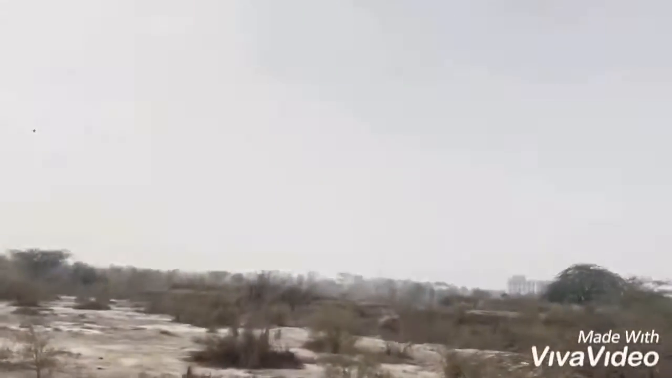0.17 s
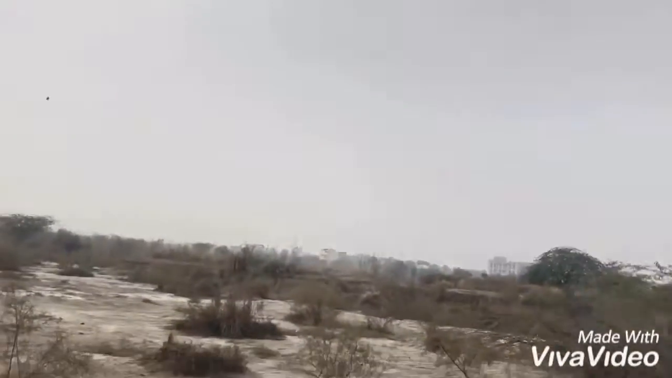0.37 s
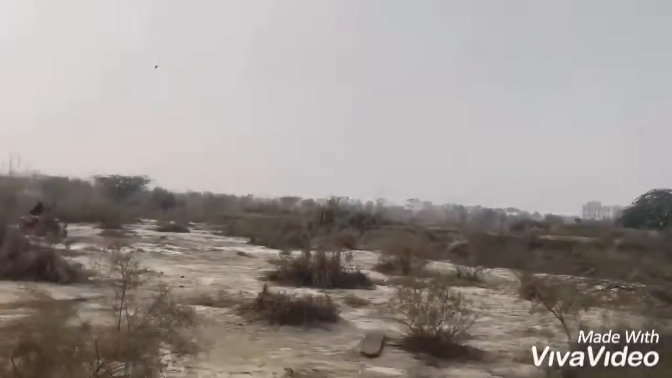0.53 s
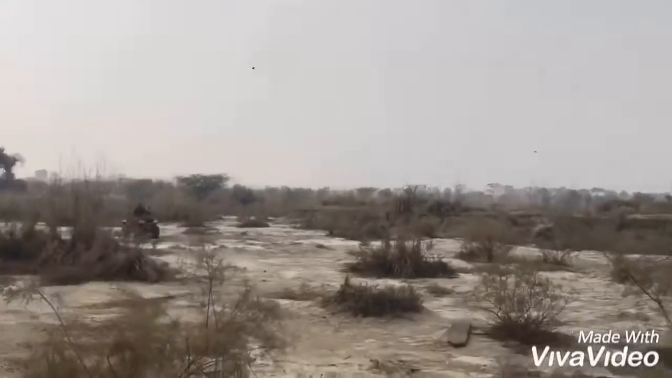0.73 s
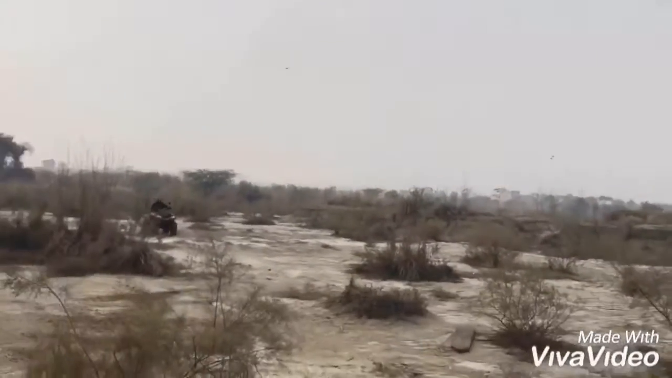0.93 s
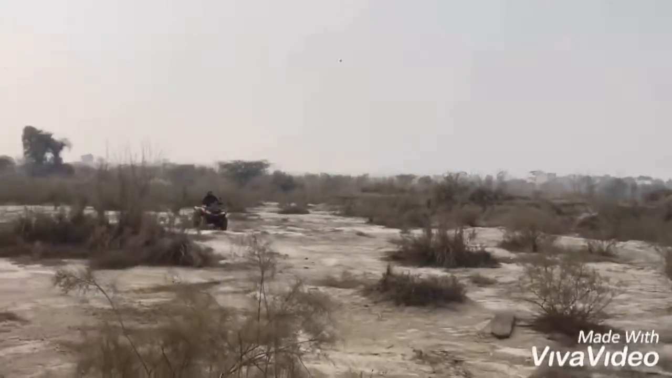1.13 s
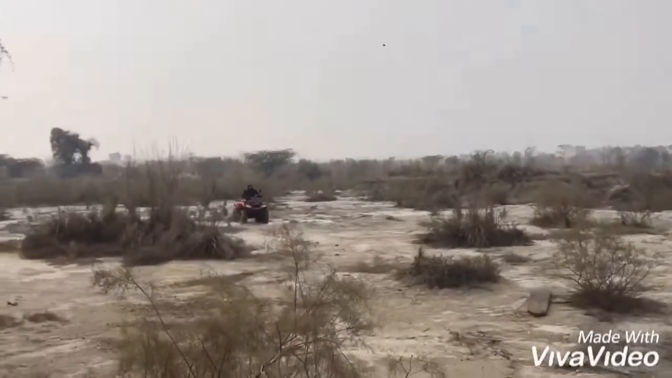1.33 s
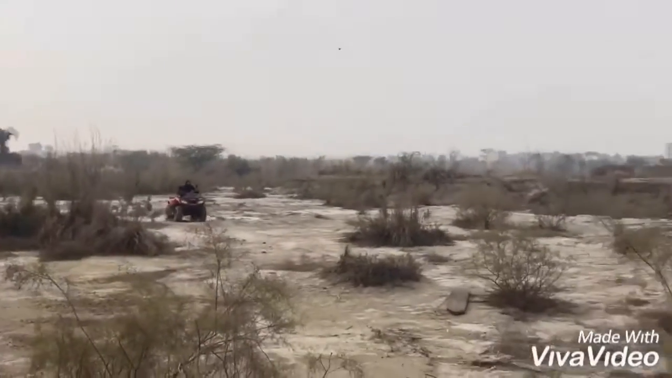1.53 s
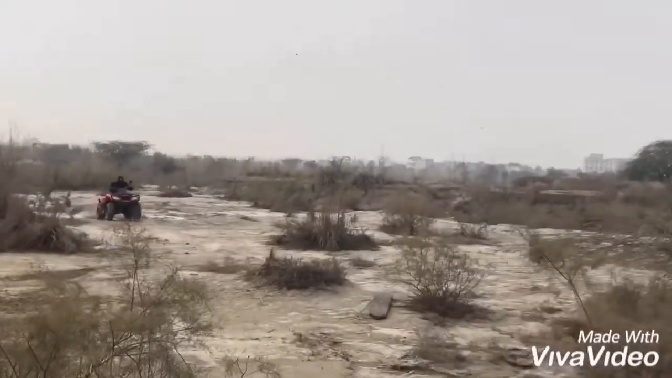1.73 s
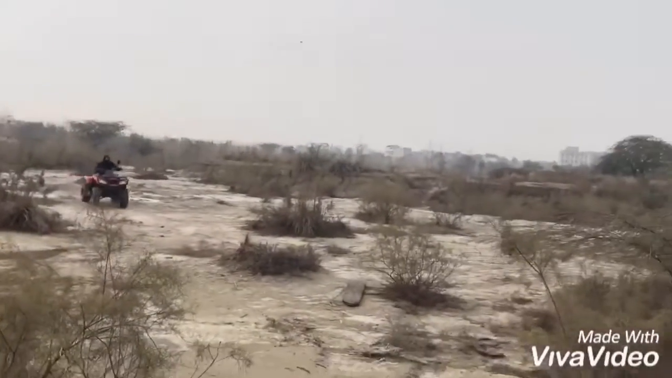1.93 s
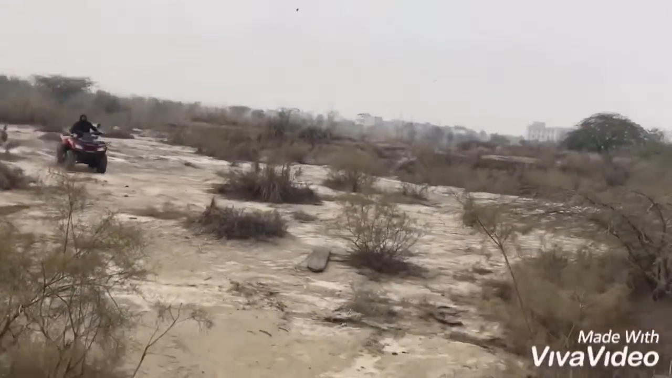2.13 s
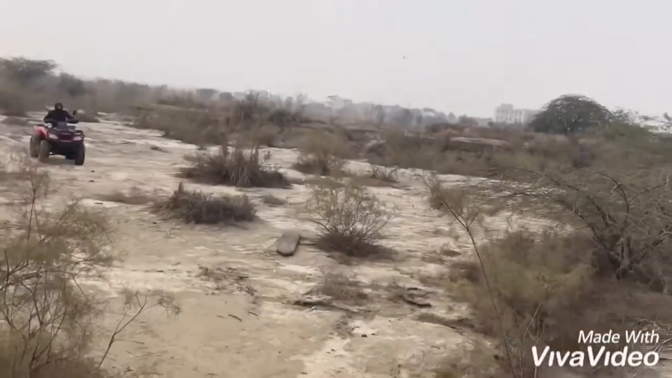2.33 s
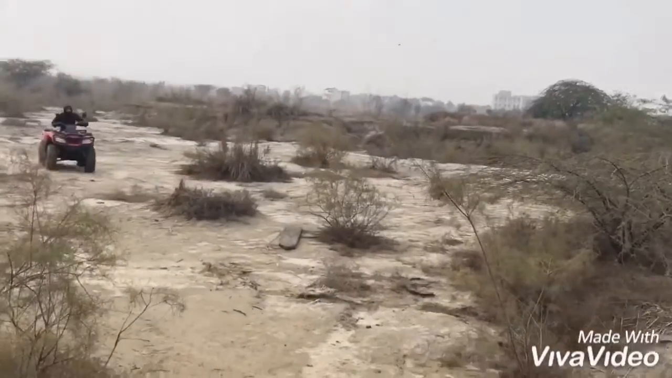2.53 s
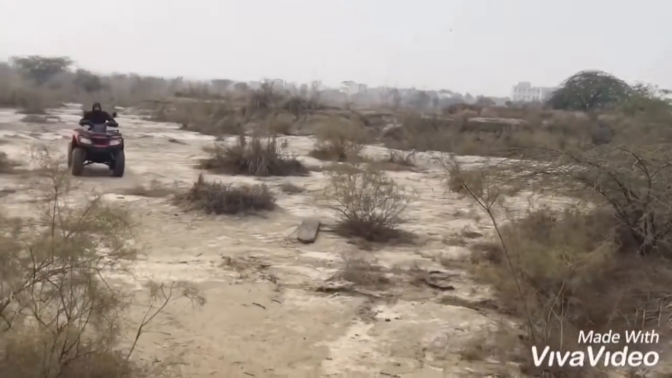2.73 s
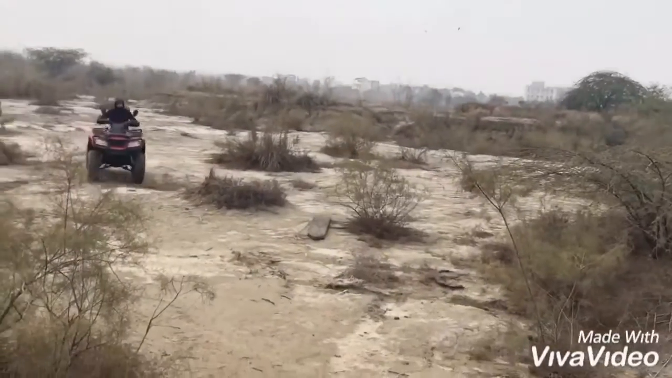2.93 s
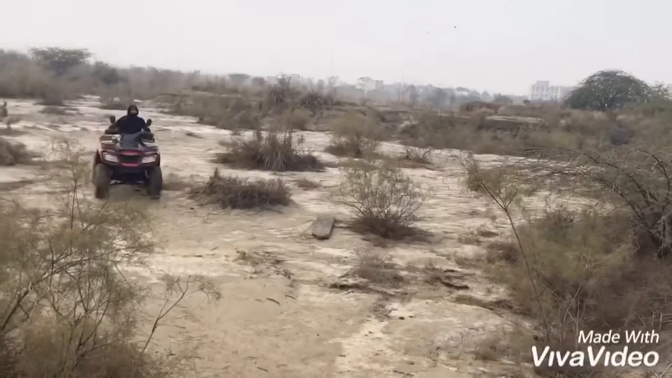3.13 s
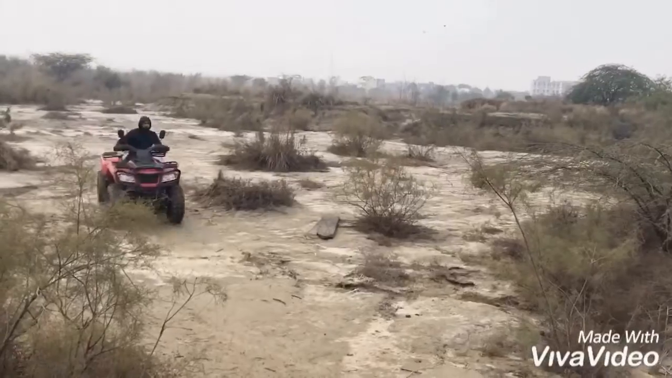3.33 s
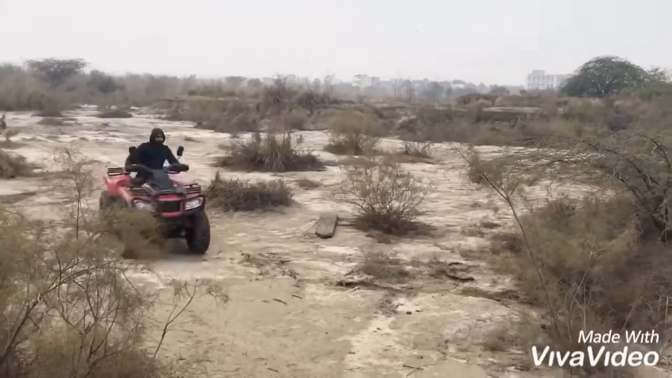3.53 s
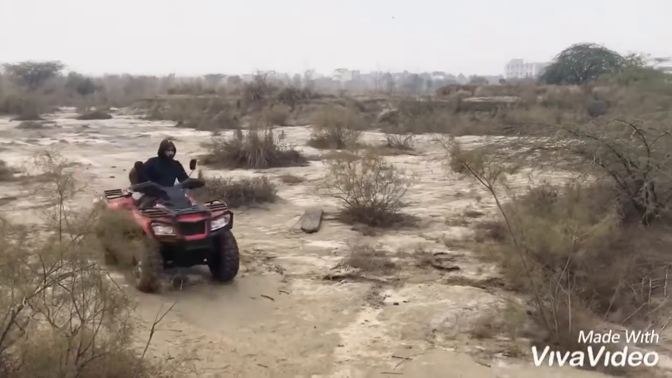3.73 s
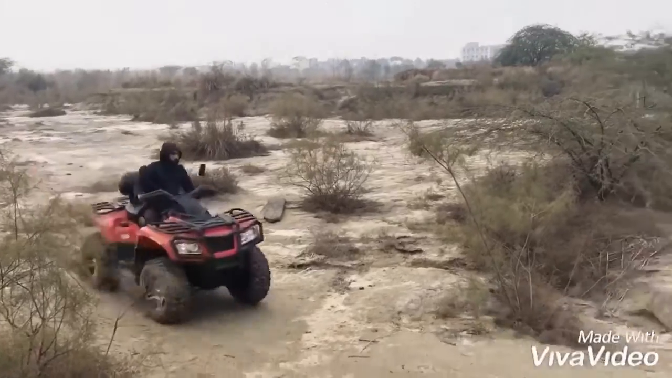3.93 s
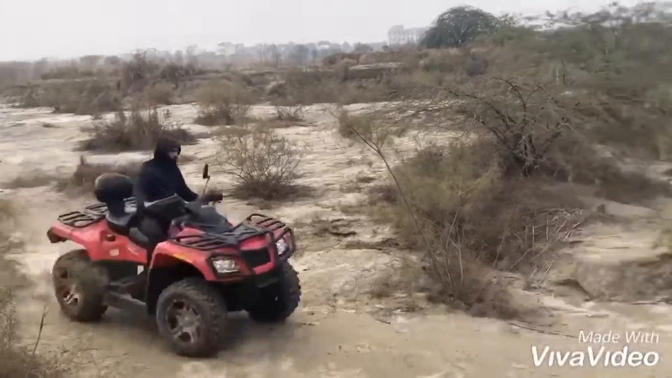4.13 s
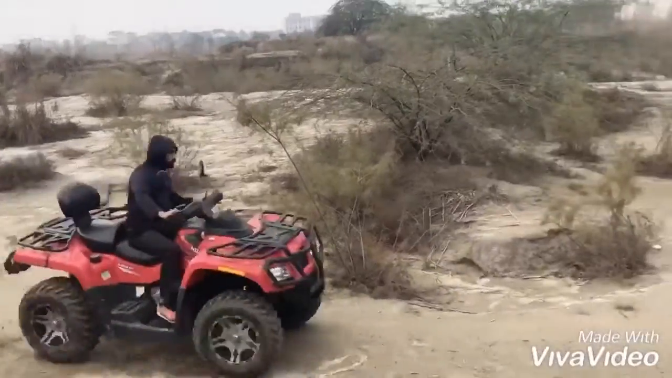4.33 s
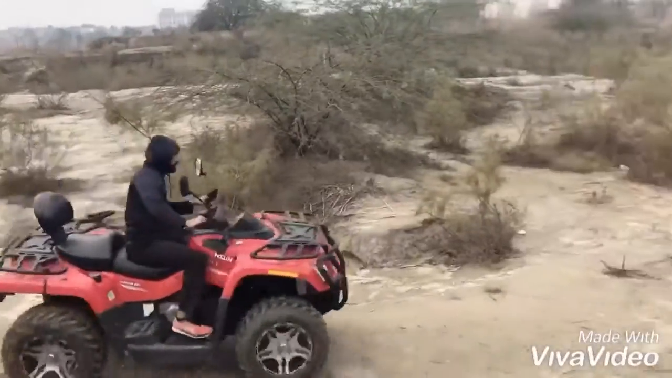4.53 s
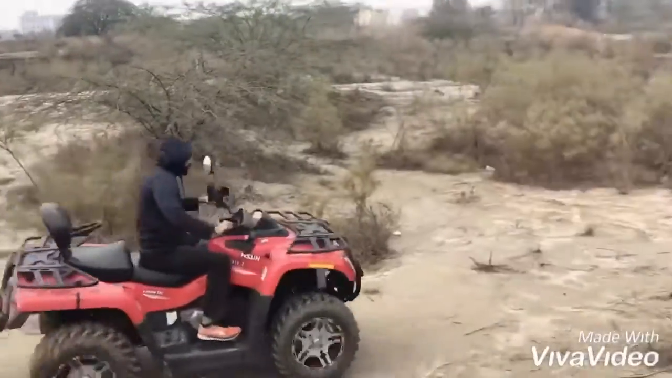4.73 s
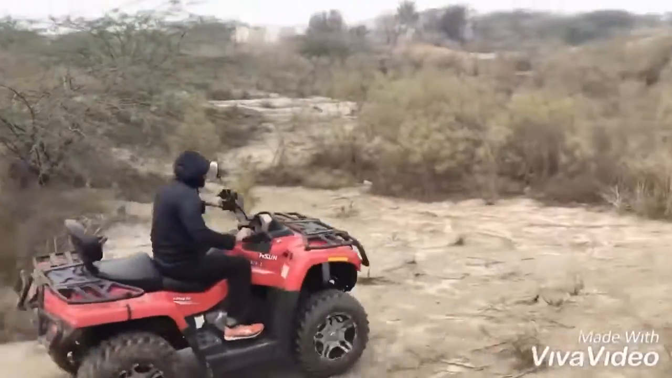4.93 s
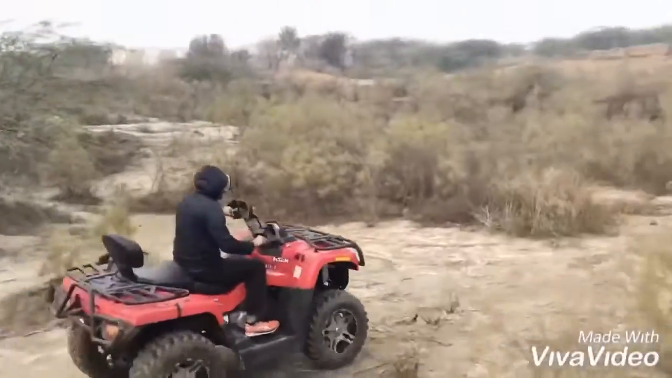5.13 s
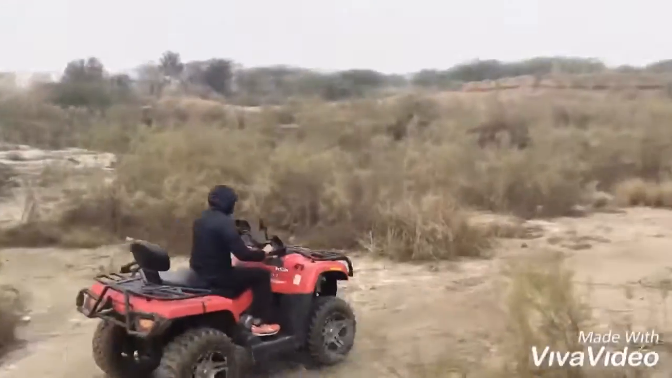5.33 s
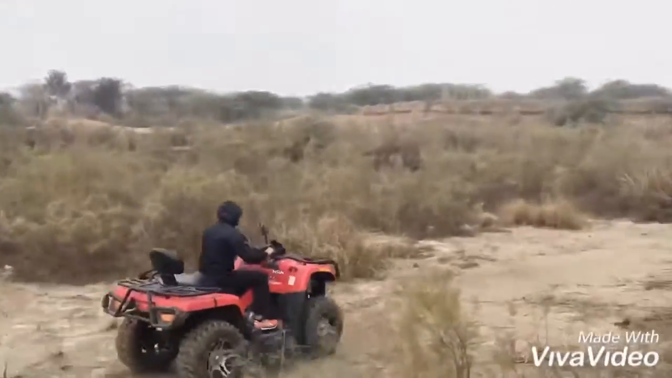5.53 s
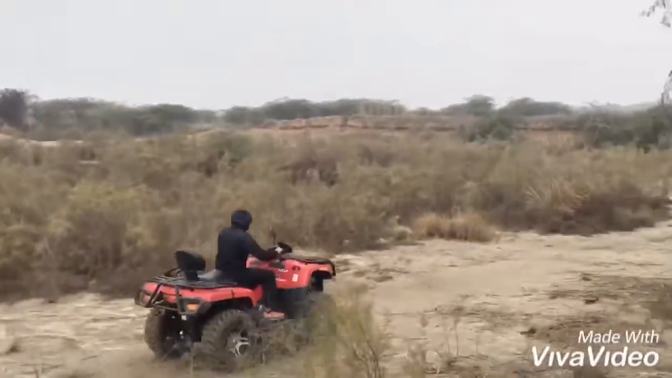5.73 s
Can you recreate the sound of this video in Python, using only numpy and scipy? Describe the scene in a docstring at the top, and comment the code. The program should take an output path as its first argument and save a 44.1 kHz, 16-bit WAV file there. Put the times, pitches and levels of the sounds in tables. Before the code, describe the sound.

A quad bike approaches over open, sandy ground, its engine throbbing and buzzing through three bursts of throttle. Racks rattle and plastic panels knock over bumps, with very faint brake squeaks. Close to the microphone the engine drops near idle, giving short low booms over the tyre rumble. Then the throttle opens and it passes, pulling away with a loud exhaust rasp.

```python
"""A V-twin quad bike approaches over rough sand in three bursts of throttle: each firing throbs in the
exhaust and buzzes in the tailpipe, valves and gears clatter, tyres roll. A distant chirp at 0.4 s.
From 1 s a dragging brake pad squeaks faintly; from 1.9 s bumps rattle the racks and knock the panels.
By 3.7 s the engine is near idle and the muffler booms in short blips. At 4.5 s the throttle opens;
the quad passes close by and pulls away, its tailpipe rasping."""
import sys
import numpy as np
from scipy import signal
from scipy.fft import rfft, irfft, next_fast_len
from scipy.io import wavfile

SR = 44100
rng = np.random.default_rng(int(sys.argv[2]) if len(sys.argv) > 2 else 0)


def store_pcm(level_fs):
    """Save levels as 16-bit WAV."""
    pcm = np.round(np.clip(level_fs, -1, 1) * 32767).astype(np.int16)
    wavfile.write(sys.argv[1], SR, np.atleast_2d(pcm).T)


N = 254898
TIME = np.arange(N) / SR

# engine speed in four-stroke cycles: time_s, cycle_hz
ENGINE_SPEED = [(0.0, 50.31), (0.212, 55.0), (0.373, 48.62), (1.043, 50.11), (1.252, 36.99), (1.403, 32.72),
                (1.537, 40.62), (1.877, 47.55), (1.983, 37.09), (2.345, 30.4), (2.776, 47.16),
                (2.924, 47.41), (3.076, 35.14), (3.37, 30.9), (3.693, 20.65), (3.746, 25.3), (4.387, 19.5),
                (4.556, 31.06), (4.757, 30.71), (4.953, 43.83), (5.237, 50.56), (5.424, 51.1),
                (5.532, 46.67), (5.683, 49.77), (5.78, 41.27)]
# throttle bursts: open_s, shut_s, first_load_db, last_load_db, extra_buzz_db
THROTTLE_BURSTS = [(-0.2, 1.109, -3, -6, 2.9), (1.46, 1.942, -4.5, -8.5, 8.5), (2.444, 2.961, -4, -4, 10),
                   (4.47, 4.785, -6, -0.2, 4), (4.766, 5.818, 4.5, 3.5, 2.4)]
# approach and pass: time_s, level_db
PROXIMITY = [(0, -21.5), (1.3, -14.5), (2.2, -12.5), (3, -11.5), (3.6, -3), (4.2, 0), (4.9, -0.5),
             (5.78, -4)]
# side facing the listener: front_until_s, alongside_at_s, behind_from_s
SIDE_TIMES = [4.2, 4.65, 5.32]
# phase spread of the exhaust orders: front_rad, alongside_rad, behind_rad
SIDE_SMEAR = [0.853, -0.39, 0.476]
# tailpipe buzz by side: front_db, alongside_db, behind_db
SIDE_BUZZ = [0.5, 4, -3.5]
# exhaust orders 1-8, even throb or lope: pull_db, coast_db
EXHAUST_ORDERS = [(9, -2.5), (12, 2.5), (3.5, 4), (-4.5, -6), (-9, -16), (-4, -16.5), (-6, -16.5),
                  (-7.5, -21)]
# throb spectrum: freq_hz, front_db, alongside_db, behind_db
THROB_SPECTRUM = [(25.0, -40, -43.5, -42), (45.8, -16.5, -20, -13.5), (76.3, -2.1, -10.5, -12.5),
                  (103, -1.16, 2.5, -20), (155.0, 0.76, 7, -5.6), (201, 1.1, -2, 1.75),
                  (281.5, -3.5, -16.5, -17.5), (420, -19.5, -21, -27)]
# muffler resonances: freq_hz, width_hz, level_db
MUFFLER_MODES = [(112, 28, 0), (190, 40, -3), (280, 40, -12)]
# muffler booms as the engine picks up near idle: centre_s, half_length_s, level_db
IDLE_BLIPS = [(3.75, 0.042, -33.5), (4.066, 0.052, -33.5), (4.239, 0.022, -27), (4.423, 0.12, -26.5)]
# boom spectrum: freq_hz, level_db
BOOM_SPECTRUM = [(90, 3), (120, 12.5), (155, -6.5), (185, -5.5), (215, 4.5), (280, -13), (345, -16.5),
                 (400, -35)]
# echoes between the baffles: delay_s
BAFFLE_DELAYS = [.0013, .0023, .0037]
# tailpipe buzz spectrum: freq_hz, level_db
BUZZ_SPECTRUM = [(330, -2), (410, 4), (460, 4), (520, -6), (575, 5), (620, 7), (690, -6), (800, -19),
                 (1000, -14), (1400, -15), (2500, -22)]
# clatter from afar, treble notched by the ground: freq_hz, level_db
FAR_CLATTER_SPECTRUM = [(400, -1), (600, -6), (850, -9), (1040, -20), (1250, -8), (1550, -16), (1950, -21),
                        (2400, -24), (3000, -28), (3650, -35), (4500, -35), (5200, -41.5), (6300, -41.5),
                        (9000, -53.5)]
# clatter close by: freq_hz, level_db
NEAR_CLATTER_SPECTRUM = [(450, -7), (650, 0), (850, -8), (1250, -9.5), (1550, -12), (1950, -16.5),
                         (2600, -23.5), (3050, -23), (3700, -30.5), (4600, -32.5), (5200, -37.5),
                         (6500, -37.5), (8000, -45.5), (14000, -54.5)]
# tyres on sand: time_s, level_db
TYRE_LEVEL = [(0, -43), (1.2, -42), (2.4, -39), (3.3, -35), (3.7, -29), (4.2, -26), (4.6, -31), (5.78, -29)]
# tyre spectrum: freq_hz, level_db
TYRE_SPECTRUM = [(30, -9.5), (60, -1), (120, 0.5), (220, 1), (350, -14), (700, -24.5)]
# open-air spectrum: freq_hz, level_db
AIR_SPECTRUM = [(100, 7.5), (1000, 7), (4000, -27.5), (8000, -29), (15000, -31.5)]
# brake squeaks: centre_s, half_length_s, level_db
BRAKE_SQUEAKS = [(1.03, .025, -70), (1.937, .03, -64.5), (2.564, 0.054, -73), (2.772, 0.036, -64),
                 (3.474, 0.023, -66), (3.88, 0.026, -61.5)]
# jolts to racks and panels: start_s, rattle_db, knock_db
JOLTS = [(1.93, -53, -35.5), (2.173, -56, -41), (2.292, -59, -41.5), (3.494, -47, -38),
         (3.563, -41.5, -31.5), (3.631, -39.5, -27), (3.718, -50, -34), (3.812, -44.5, -30.5),
         (3.94, -47.5, -31.5), (4.065, -49, -31), (4.107, -50, -29.5), (4.155, -46, -28),
         (4.199, -64, -30.5), (4.28, -53, -33), (4.295, -50, -28)]
# panel knock spectrum: freq_hz, level_db
PANEL_SPECTRUM = [(380, -14), (600, 3), (715, 8), (850, -4.5), (1000, 3), (1200, -5), (1550, -7),
                  (2200, -12)]
# rasp under load, as the tailpipe turns to the listener: time_s, level_db
RASP_LEVEL = [(0, -78), (2.4, -77), (2.8, -61), (3.1, -75), (4.4, -51.5), (4.72, -49.5), (4.77, -33),
              (4.85, -31), (4.95, -31), (5.2, -33.5), (5.45, -36), (5.7, -34.5), (5.78, -46)]
# rasp spectrum: freq_hz, level_db
RASP_SPECTRUM = [(900, 4), (1500, 4), (2400, -4), (3300, -11), (4500, -15), (5200, -19), (8000, -27),
                 (10300, -27), (11500, -25.5), (15500, -29.5)]

SECOND_FIRING_CYCLES = .39   # lag of the second cylinder


def from_db(db):
    """Decibels to gain."""
    return 10 ** (np.asarray(db) / 20)


def unit_rms(x):
    """Scale to unit power."""
    return x / np.sqrt(np.mean(x ** 2) + 1e-20)


def curve(rows):
    """A (time_s, value) table at every sample."""
    return np.interp(TIME, *np.transpose(rows))


def swells(rows):
    """Sum of bell-shaped envelopes."""
    return sum(from_db(db) * np.exp(-((TIME - centre_s) / half_s) ** 2) for centre_s, half_s, db in rows)


def gain_at(spectrum, hz):
    """Gain of a spectrum, falling 33 dB per octave beyond its ends."""
    freq_hz, level_db = np.transpose(spectrum)
    beyond_octaves = np.abs(np.log2(hz / np.clip(hz, freq_hz[0], freq_hz[-1])))
    return from_db(np.interp(np.log(hz), np.log(freq_hz), level_db) - 33 * beyond_octaves)


def colour(x, spectrum):
    """Filter by a spectrum; unit power."""
    size = next_fast_len(N + 4096)
    hz = np.maximum(np.fft.rfftfreq(size, 1 / SR), 1)
    return unit_rms(irfft(rfft(x, size) * gain_at(spectrum, hz), size)[:N])


def band(x, low_hz, high_hz):
    """Gentle band-pass; unit power."""
    sos = signal.butter(2, [low_hz, high_hz], "band", fs=SR, output="sos")
    return unit_rms(signal.sosfilt(sos, x))


def drift(rate_hz):
    """Smooth random wander; unit power."""
    hop = 40
    pole = np.exp(-2 * np.pi * rate_hz * hop / SR)
    noise = rng.standard_normal(N // hop + 2002)
    slow = signal.lfilter([1], [1, -2 * pole, pole * pole], noise)[2000:]
    return np.interp(np.arange(N) / hop, np.arange(len(slow)), unit_rms(slow))


def throttle(ramp_s):
    """Ramped bursts; gives openness (0-1), load_db and buzz_db."""
    opened, load_db, buzz_db = np.zeros((3, N))
    for open_s, shut_s, first_db, last_db, extra_db in THROTTLE_BURSTS:
        gate = np.clip(np.minimum(TIME - open_s, shut_s - TIME) / ramp_s + .5, 0, 1)
        opened += gate
        load_db += gate * np.interp(TIME, [open_s, shut_s], [first_db, last_db])
        buzz_db += gate * extra_db
    return np.minimum(opened, 1), load_db, buzz_db


def firing_clicks(cycles, cycle_hz, second_gain, jitter_cycles, uneven_db):
    """One click per cylinder and cycle, slightly early or late, strong or weak."""
    clicks = np.zeros(N)
    for lag, gain in ((0, 1), (SECOND_FIRING_CYCLES, second_gain)):
        count = np.floor(cycles - lag + jitter_cycles * drift(25))
        clicks[1:] += gain * (np.diff(count) > 0)
    return clicks * from_db(uneven_db * drift(36)) / np.sqrt(cycle_hz)


def firing_puffs(cycles, cycle_hz, decay_s, second_gain, floor, uneven_db):
    """Envelope: a decaying burst of random strength at each firing, over a floor; unit power."""
    envelope = floor
    for lag, gain in ((0, 1), (SECOND_FIRING_CYCLES, second_gain)):
        count, fraction = np.divmod(cycles - lag, 1)
        strength = from_db(uneven_db * rng.standard_normal(512))[count.astype(int) % 512]
        envelope = envelope + gain * strength * np.exp(-fraction / cycle_hz / decay_s)
    return unit_rms(envelope)


def muffler_phase_rad(hz):
    """The muffler's chambers delay the orders near each resonance."""
    response = sum(from_db(db) / (1 + 1j * (hz ** 2 - mode_hz ** 2) / (hz * width_hz))
                   for mode_hz, width_hz, db in MUFFLER_MODES)
    return np.angle(response)


def exhaust_throb(cycles, cycle_hz, opened, load_db, gain_db):
    """Low firing orders through the muffler: a throb under load, a lope coasting, booms near idle."""
    lag_cycles, coast_lag_cycles, boom_lag_cycles = .12, .161, .27
    side_weights = [np.interp(TIME, SIDE_TIMES, side) for side in np.eye(3)]
    smear_rad = np.interp(TIME, SIDE_TIMES, SIDE_SMEAR)
    freq_hz, *sides_db = np.transpose(THROB_SPECTRUM)
    blips = swells(IDLE_BLIPS)
    out = np.zeros(N)
    for order, (pull_db, coast_db) in enumerate(EXHAUST_ORDERS, 1):
        hz = order * cycle_hz
        colour_db = sum(weight * np.interp(np.log(hz), np.log(freq_hz), db)
                        for weight, db in zip(side_weights, sides_db))
        rad_per_cycle = 2 * np.pi * order
        phase = rad_per_cycle * (cycles - lag_cycles) + muffler_phase_rad(hz)
        smeared = phase + smear_rad * (order - 3) ** 2
        pulling = opened * from_db(pull_db + load_db) * np.cos(smeared)
        coasting = (1 - opened) * from_db(coast_db) * np.cos(smeared - rad_per_cycle * coast_lag_cycles)
        boom = blips * gain_at(BOOM_SPECTRUM, hz) * np.cos(phase - rad_per_cycle * boom_lag_cycles)
        waver_db = 1.3 * drift(5) + .2 * order * drift(14)
        out += from_db(waver_db) * (from_db(gain_db + colour_db) * (pulling + coasting) + boom)
    return np.sqrt(2) * out


def tailpipe_buzz(cycles, cycle_hz, feedback):
    """Echoes between the baffles smear each pulse's sharp edge into a rounded growl."""
    edges = firing_clicks(cycles, cycle_hz, second_gain=.35, jitter_cycles=.0015, uneven_db=.8)
    for delay_s in BAFFLE_DELAYS:
        taps = np.r_[1, np.zeros(int(delay_s * SR)), feedback]
        edges = signal.lfilter(taps[::-1], taps, edges)   # all-pass
    return colour(edges, BUZZ_SPECTRUM)


def engine_clatter(cycles, cycle_hz, ring_s, tick_db):
    """Valves and gears tick alike every cycle over a pulsing hiss; the colour fades from far to near."""
    age_s = TIME[:SR // 25]
    casing = rng.standard_normal(len(age_s)) * np.exp(-age_s / ring_s)
    strikes = firing_clicks(cycles, cycle_hz, second_gain=.8, jitter_cycles=.0005, uneven_db=1)
    ticks = unit_rms(signal.fftconvolve(strikes, casing)[:N])
    puffs = firing_puffs(cycles, cycle_hz, decay_s=.005, second_gain=.6, floor=1.3, uneven_db=1.5)
    source = from_db(tick_db) * ticks + puffs * rng.standard_normal(N)
    near = np.interp(TIME, [1.9, 2.7], [0, 1])
    return (1 - near) * colour(source, FAR_CLATTER_SPECTRUM) + near * colour(source, NEAR_CLATTER_SPECTRUM)


def tyres():
    """Low rumble of tyres rolling on sand."""
    return from_db(curve(TYRE_LEVEL)) * colour(rng.standard_normal(N), TYRE_SPECTRUM)


def open_air(level_db):
    """Steady outdoor hush."""
    return from_db(level_db) * colour(rng.standard_normal(N), AIR_SPECTRUM)


def distant_chirp(centre_s, half_length_s, start_hz, end_hz, level_db):
    """A short gliding tone, hoarse with fast amplitude noise."""
    hz = np.interp(TIME, [centre_s - half_length_s, centre_s + half_length_s], [start_hz, end_hz])
    envelope = swells([(centre_s, half_length_s, level_db)])
    return envelope * drift(350) * np.sin(2 * np.pi * np.cumsum(hz) / SR)


def brake_squeak(pitch_hz, half_width_hz):
    """A dragging pad sings on one narrow mode, flaring as it brushes the disc."""
    drag = from_db(-79) * np.interp(TIME, [0, 2.7, 3.9, 4.2], [.3, .84, .89, .16])
    mode = band(rng.standard_normal(N), pitch_hz - half_width_hz, pitch_hz + half_width_hz)
    return (drag + swells(BRAKE_SQUEAKS)) * mode


def bumps(rattle_decay_s, knock_decay_s, rise_s):
    """Each jolt gives a gritty rattle of the racks and a hollow knock of the plastic panels."""
    rattle, knock = np.zeros((2, N))
    age_s = TIME[:SR // 4]
    rise = 1 - np.exp(-age_s / rise_s)
    for start_s, rattle_db, knock_db in JOLTS:
        at = int(start_s * SR)
        rattle[at:at + len(age_s)] += from_db(rattle_db) * rise * np.exp(-age_s / rattle_decay_s)
        knock[at:at + len(age_s)] += from_db(knock_db) * rise * np.exp(-age_s / knock_decay_s)
    grit = rng.standard_normal(N) * from_db(3 * drift(300))
    return rattle * band(grit, 1600, 4100) + knock * colour(rng.standard_normal(N), PANEL_SPECTRUM)


def tailpipe_rasp(cycles, cycle_hz):
    """Separate cracks as the throttle opens; gas flow then fills the gaps."""
    gas_flow = np.interp(TIME, [4.4, 4.77, 4.9, 5.4], [.3, .03, .12, .25])
    blasts = firing_puffs(cycles, cycle_hz, decay_s=.004, second_gain=.15, floor=gas_flow, uneven_db=1.2)
    return from_db(curve(RASP_LEVEL)) * colour(blasts * rng.standard_normal(N), RASP_SPECTRUM)


def scene():
    """One crankshaft drives all engine layers; the other sources add to them. Mono."""
    cycle_hz = curve(ENGINE_SPEED)
    cycles = np.cumsum(cycle_hz) / SR
    cycles -= np.interp(4.906, TIME, cycles)   # a firing falls at 4.906 s
    opened, load_db, buzz_db = throttle(ramp_s=.15)
    shut = 1 - opened
    near_db = curve(PROXIMITY)
    revs_db = 9 * np.log2(cycle_hz / 45)   # 9 dB per octave about cruising speed
    side_db = np.interp(TIME, SIDE_TIMES, SIDE_BUZZ)
    pipe_db = -37.5 + .66 * near_db + revs_db + load_db + buzz_db - 3 * shut + side_db
    clatter_db = -29.5 + near_db + revs_db + .1 * buzz_db - shut
    mix = exhaust_throb(cycles, cycle_hz, opened, load_db, gain_db=-19 + .52 * near_db)
    mix += from_db(pipe_db) * tailpipe_buzz(cycles, cycle_hz, feedback=.5)
    mix += from_db(clatter_db) * engine_clatter(cycles, cycle_hz, ring_s=.057, tick_db=-6)
    mix += tailpipe_rasp(cycles, cycle_hz)
    mix += tyres()
    mix += open_air(level_db=-54)
    mix += bumps(rattle_decay_s=.017, knock_decay_s=.018, rise_s=.0025)
    mix += brake_squeak(pitch_hz=5925, half_width_hz=86)
    mix += distant_chirp(centre_s=.427, half_length_s=.014, start_hz=2000, end_hz=1720, level_db=-45)
    return mix[None]


def record(dry):
    """8 ms fade-in, steep low-pass at 15.6 kHz."""
    fade_in = np.minimum(TIME / .008, 1) ** 2
    low_pass = signal.ellip(10, .1, 80, 15600, fs=SR, output="sos")
    return signal.sosfilt(low_pass, dry * fade_in)


dry = scene()
out = record(dry)
store_pcm(out)
```